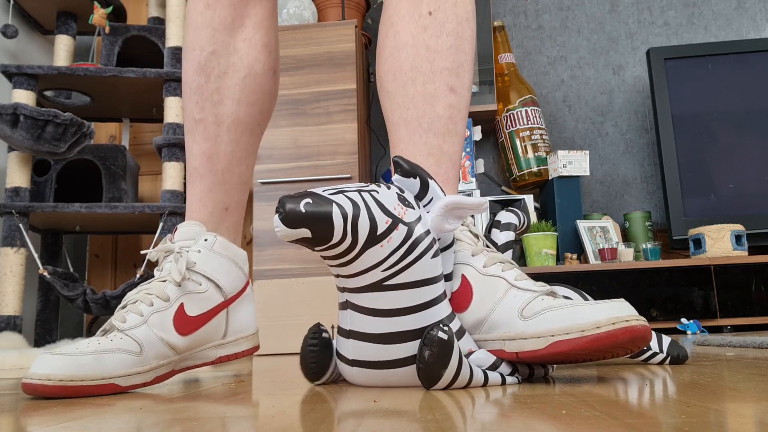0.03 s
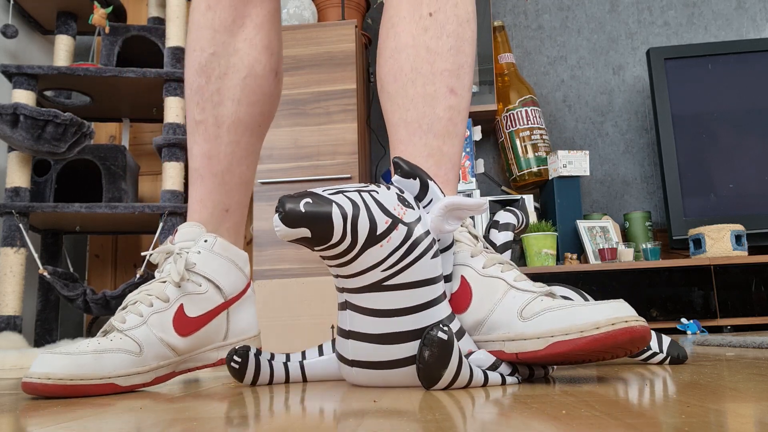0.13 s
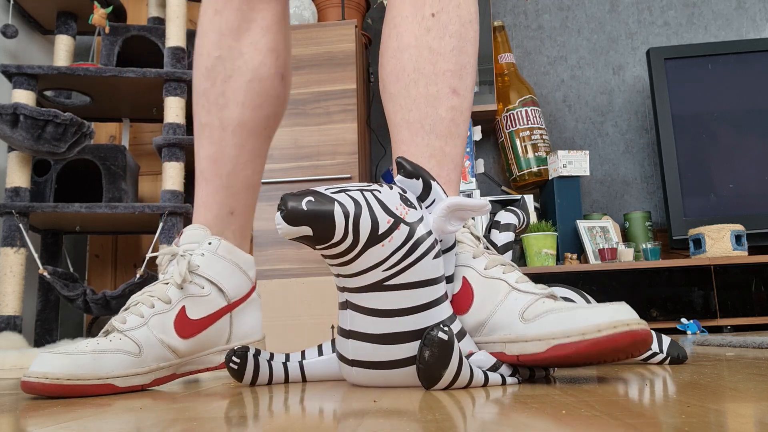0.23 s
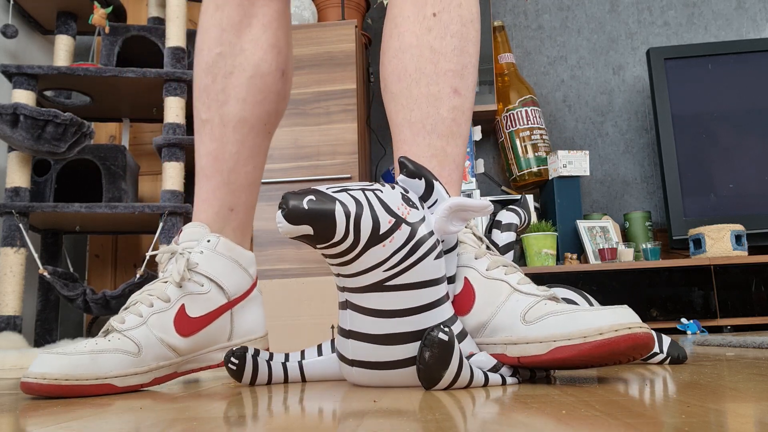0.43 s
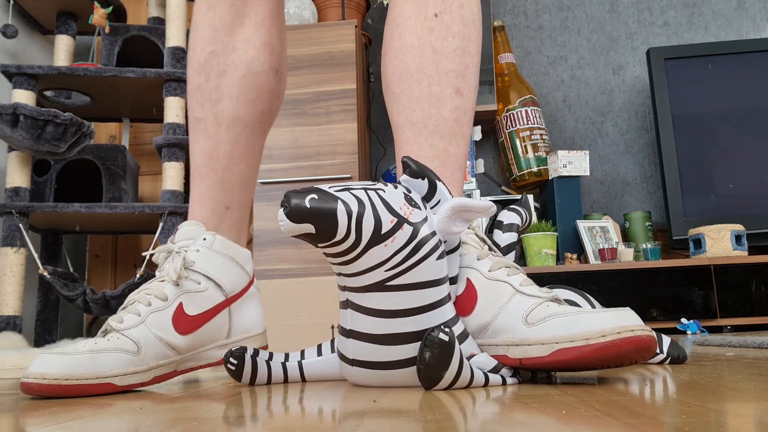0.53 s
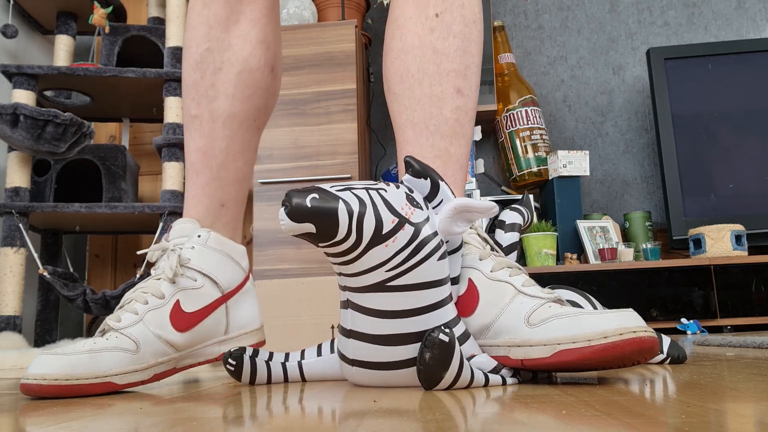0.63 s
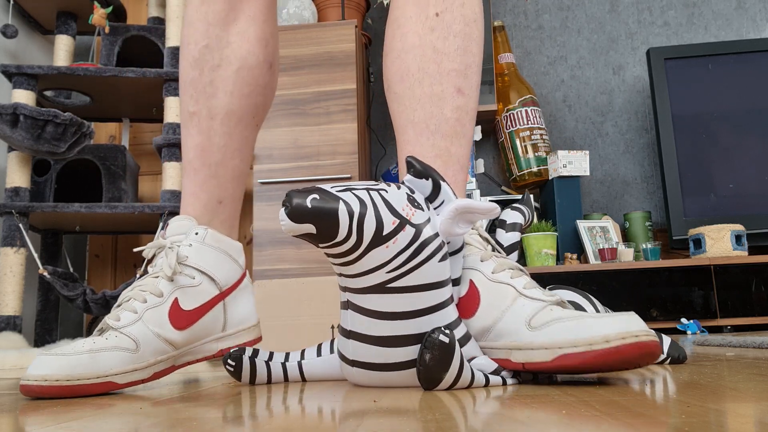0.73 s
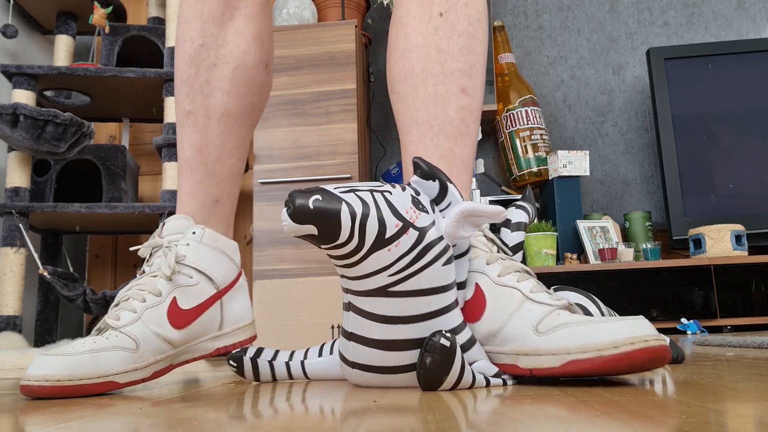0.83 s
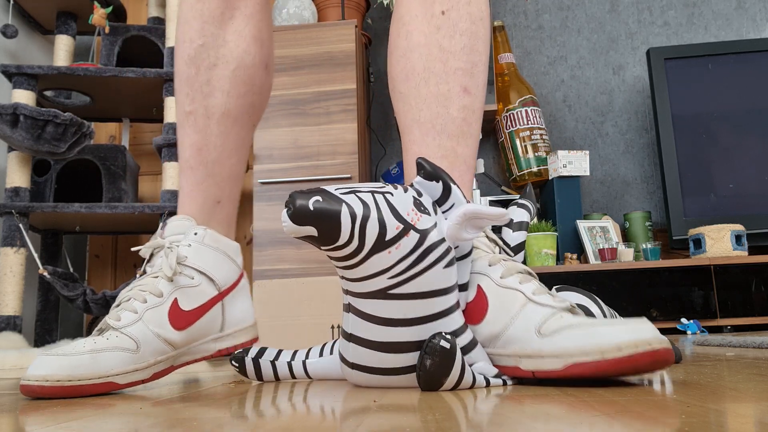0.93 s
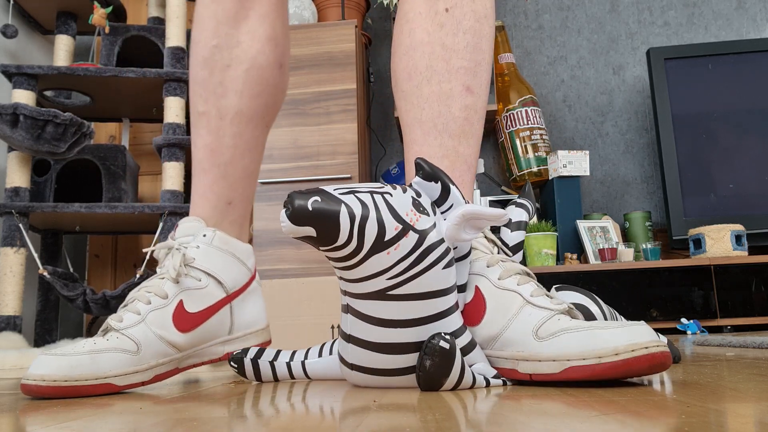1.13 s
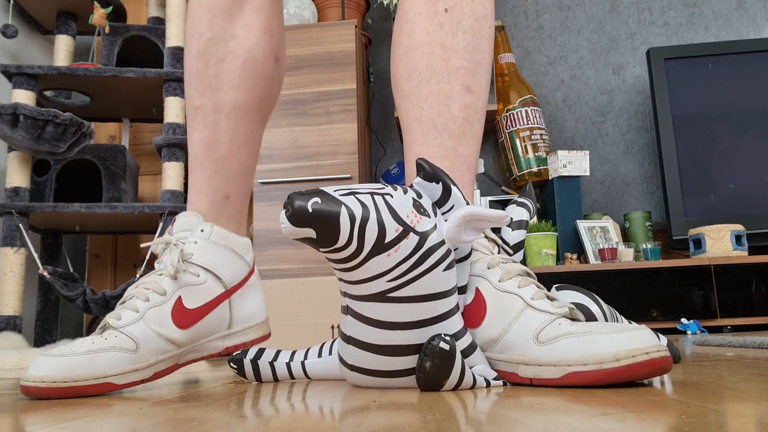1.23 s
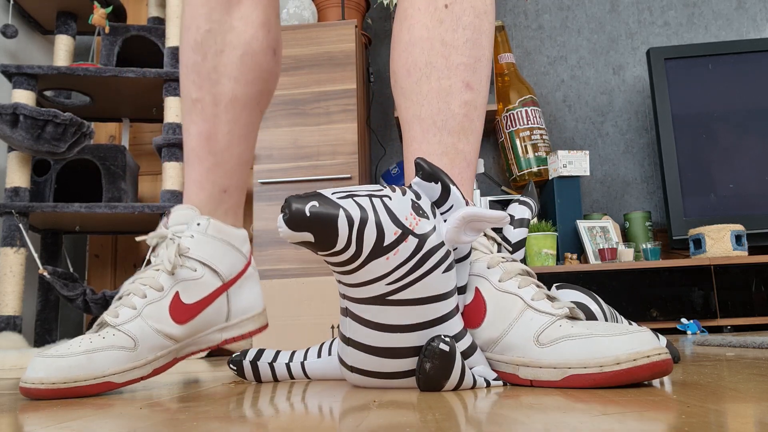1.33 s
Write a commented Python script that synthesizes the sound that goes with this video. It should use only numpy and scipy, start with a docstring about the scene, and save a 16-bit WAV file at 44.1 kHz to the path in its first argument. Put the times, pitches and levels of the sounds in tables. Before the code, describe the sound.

One hollow thump of a kicked inflatable toy, with soft shoe rubbing on vinyl.

```python
"""An inflatable vinyl toy is brushed by a sneaker and kicked with one hollow thump in a quiet living room.
Its skin caves in and springs back, and the air-filled body rings in its normal modes. The shoe rubs
along the vinyl, where stick-slip friction excites the resonances of the skin, then settles with two
soft steps that make the wooden floor boom. The skin and the sole give small ticks."""
import sys
import numpy as np
from scipy import signal
from scipy.fft import rfft, irfft
from scipy.io import wavfile

SR = 44100
rng = np.random.default_rng(int(sys.argv[2]) if len(sys.argv) > 2 else 0)


def log_audio(samples):
    """Write samples as a 16-bit WAV file to the path given in sys.argv[1]."""
    # one column per channel
    frames = np.atleast_2d(samples).T
    # limit to full scale, then quantise
    limited = np.clip(frames, -1, 1)
    pcm = np.round(limited * 32767).astype(np.int16)
    wavfile.write(sys.argv[1], SR, pcm)


N = 61739
T = np.arange(N) / SR
KICK_S = .2551

# soft contacts of the wobbling toy with the shoe: start_s, puff_db, ring_db
CONTACTS = [(0.284, -19.5, -41.5), (.309, -63, -46), (0.344, -38, -59.5), (0.397, -37, -64.5),
            (0.6614, -36.5, -88), (.912, -41, -81), (1.101, -43, -66.5), (1.286, -47, -86),
            (1.363, -49.5, -93), (1.383, -47.5, -91)]
# spectrum of the sole striking the floor: frequency_hz, relative_db
SOLE_SPECTRUM = [(100, -4.5), (550, -18), (1250, -2), (1800, -8), (2400, -7.5), (3300, -13.5), (4500, -21),
                 (8000, -38), (15000, -32)]


def amp(db):
    """Decibels to amplitude ratio."""
    return 10 ** (np.asarray(db) / 20)


def unit(x):
    """Normalisation to an rms of one."""
    return x / np.sqrt(np.mean(x ** 2) + 1e-20)


def read(points, hz):
    """Interpolation on a log-frequency axis."""
    knots_hz, values = np.transpose(points)
    return np.interp(np.log(hz + 1), np.log(knots_hz + 1), values)


def add(mix, start_s, sound):
    """Superposition: a sound joins the mix at its start time."""
    part = mix[max(round(start_s * SR), 0):][:len(sound)]
    part += sound[:len(part)]


def colour(x, spectrum):
    """Spectral shaping by a minimum-phase filter of unit energy."""
    log_gain = np.log(amp(read(spectrum, abs(np.fft.fftfreq(4096, 1 / SR)))))
    taps = np.fft.ifft(np.exp(np.conj(signal.hilbert(log_gain)))).real[:2048]
    return signal.fftconvolve(x, taps / np.linalg.norm(taps))[:len(x)]


def burst(decay_s):
    """A broadband transient: noise under exponential decay."""
    return rng.standard_normal(4096) * np.exp(-T[:4096] / decay_s)


def ring(modes):
    """Free vibration: each normal mode is a damped sine."""
    return sum(amp(db - 60 * T / t60_s) * np.sin(2 * np.pi * hz * T) for hz, db, t60_s in modes)


def friction(strokes, spectrum, slips_per_s=3800, spread_db=4, hiss_share=0.22):
    """Stick-slip friction: dense random impulses and smooth hiss follow the level of each stroke."""
    slips = (rng.random(N) < slips_per_s / SR) * rng.choice([-1, 1], N)
    sizes = amp(spread_db * np.minimum(rng.exponential(1, N), 4))
    hiss = np.sqrt(hiss_share) * rng.standard_normal(N)
    grain = np.sqrt(1 - hiss_share) * unit(slips * sizes) + hiss
    envelope = sum(amp(np.interp(T, *np.transpose(stroke), left=-140, right=-140)) for stroke in strokes)
    return colour(grain * envelope, spectrum)


def skin(x, direct_db=-1):
    """Membrane resonance: a scrape or slap also excites the narrow modes of the taut vinyl."""
    # skin resonances: pitch_hz, gain_db, bandwidth_hz
    modes = [(820, 0.5, 55), (1145, 3, 35), (1530, -0.5, 45), (1627, -2, 50), (1864, -2, 36),
             (1996, 0.5, 31), (2205, 2, 42), (2345, 0, 40), (2458, 2, 35), (2673, 2, 45), (2778, 0, 75),
             (2940, -1, 27), (4670, -11.5, 180)]
    resonant = sum(amp(db) * signal.lfilter(*signal.iirpeak(hz, hz / width_hz, SR), x)
                   for hz, db, width_hz in modes)
    return amp(direct_db) * x + resonant


def rubbing():
    """Sliding friction on vinyl: a faint shuffle, a swipe into the kick, then rubs after it."""
    # stroke envelopes (rubs holds several): time_s, level_db
    shuffle = [(0, -67), (.04, -68.5), (.08, -60.5), (.12, -60), (.16, -68.5), (.2, -70)]
    swipe = [(.0, -88.5), (.15, -71.5), (.205, -58), (.225, -42.5), (.24, -37.5), (.251, -31.5),
             (.258, -42), (.266, -65)]
    rubs = [
        [(.56, -91.5), (.6, -78), (.655, -70.5), (.7, -60.5), (.765, -56.5), (.8, -64), (.83, -85)],
        [(.86, -72.5), (.886, -60.5), (.905, -54), (.925, -50), (.96, -50), (.98, -53.5), (.998, -53),
         (1.018, -56.5), (1.034, -55.5), (1.048, -71)],
        [(1.09, -89), (1.12, -69.5), (1.14, -70.5), (1.17, -77)],
        [(1.245, -74.5), (1.265, -73.5), (1.29, -69), (1.32, -95), (1.345, -70.5), (1.39, -78), (1.4, -75)],
    ]
    # their friction spectra: frequency_hz, relative_db
    shuffle_spectrum = [(60, -47.5), (140, -22), (306, -21.5), (600, -4), (808, -2.5), (1100, -5.5),
                        (2000, -7.5), (3320, -14), (15500, -35)]
    swipe_spectrum = [(50, -39), (110, -11), (550, -16.5), (843, -2), (1160, -13.5), (2870, -1.5),
                      (3770, -9), (6000, -14), (7000, -20.5), (11500, -15), (15500, -27.5)]
    rub_spectrum = [(60, -39), (160, -21.5), (264, -16.5), (680, -16), (1210, -4.5), (1880, -5.5),
                    (2090, -5), (2750, 0), (3460, -8), (4700, -9.5), (5100, -14.5), (6120, -13),
                    (7400, -25.5), (8800, -19), (15500, -30)]
    brushing = friction([shuffle], shuffle_spectrum)
    scraping = friction([swipe], swipe_spectrum) + friction(rubs, rub_spectrum)
    return brushing + skin(scraping)


def kick(slap_db=-20.5, slap_lead_s=.0006, low_cut_hz=30):
    """Impact on a membrane: the slapped skin caves in, then the enclosed air springs back."""
    # rarefaction, then compression: delay_s, relative_pressure, width_s
    swings = [(0, -.22, .00026), (.0013, .22, .00032)]
    # spectrum of the slap: frequency_hz, relative_db
    spectrum = [(60, -16.5), (150, -3.5), (400, 5.5), (620, -11.5), (830, 6), (1100, -0.5), (1900, 0.5),
                (2700, -10.5), (3800, -14.5), (6000, -23), (15000, -32)]
    pressure = sum(size * np.exp(-.5 * ((T - KICK_S - delay_s) / width_s) ** 2)
                   for delay_s, size, width_s in swings)
    out = signal.lfilter(*signal.butter(2, low_cut_hz, "high", fs=SR), pressure)
    slap = skin(colour(burst(decay_s=0.0049), spectrum))
    add(out, KICK_S - slap_lead_s, amp(slap_db) * slap)
    return out


def toy(kick_ring_db=-39.5, spring_back_s=.0012):
    """Cavity resonance: the air-filled body rings after the kick and again with each bump."""
    # body modes: pitch_hz, relative_db, t60_s
    modes = [(37.54, -17.5, 0.27), (65.4, -18, 0.098), (118.5, -8, 0.25), (144.9, 2, .33), (192, -8, 0.34),
             (205.8, -2.5, 0.25), (242.7, -3.5, .2), (375, -14.5, 0.067), (400, -13, 0.13),
             (453, -12.5, .12), (500, -11.5, 0.063), (708, -7.5, 0.39), (823, -8.5, 0.047),
             (1157, -30.5, .16)]
    out, ringing = np.zeros(N), ring(modes)
    add(out, KICK_S + spring_back_s, amp(kick_ring_db) * ringing)
    for start_s, _, ring_db in CONTACTS:
        add(out, start_s, amp(ring_db) * ringing)
    return out


def bumps():
    """Compliant contact carries little treble: the toy wobbles against the shoe with dull puffs."""
    # spectrum of a puff: frequency_hz, relative_db
    spectrum = [(40, -22), (110, -14.5), (180, -5.5), (300, -8.5), (520, -6.5), (800, -15.5), (2000, -38.5),
                (8000, -70.5)]
    out = np.zeros(N)
    for start_s, puff_db, _ in CONTACTS:
        puff = burst(decay_s=.005)
        add(out, start_s, amp(puff_db) * puff / np.linalg.norm(puff))
    return colour(out, spectrum)


def ticks():
    """Brief transients are broadband: the vinyl skin crinkles in bright ticks."""
    # crinkles: start_s, level_db, decay_s
    crinkles = [(0.401, -62, 0.0049), (0.424, -54.5, 0.0029), (0.4728, -48.5, 0.0031), (.564, -68, 0.001),
                (.6612, -52, 0.011), (1.064, -57, .001), (1.072, -51.5, 0.00074), (1.116, -50, 0.00059),
                (1.1436, -46.5, 0.00095)]
    # spectrum of a tick: frequency_hz, relative_db
    spectrum = [(100, -15), (400, 1), (1000, 1), (2500, 4.5), (3800, 3), (5000, 3.5), (7500, -8),
                (9000, -1.5), (15000, -9.5)]
    out = np.zeros(N)
    for start_s, db, decay_s in crinkles:
        add(out, start_s, amp(db) * burst(decay_s) / 2)
    return colour(out, spectrum)


def steps(grit_db=-9, boom_rise_s=0.0041):
    """Impact on a plate: the sole lands with a gritty knock and the floor's modes boom."""
    # footfalls: start_s, push_db, width_ms, boom_db
    footfalls = [(1.0240, -38, 0.27, -42.5), (1.1996, -50.5, 0.43, -48.5)]
    # floor modes: pitch_hz, relative_db, t60_s
    modes = [(31.8, -14, 0.61), (69.5, -21, .26), (81.6, -1, 0.27), (168.3, -6.5, 0.118),
             (219, -6.5, 0.086), (338, -11.5, 0.055)]
    knocks, booms = np.zeros(N), np.zeros(N)
    boom = ring(modes) * (1 - np.exp(-T / boom_rise_s))
    for start_s, push_db, width_ms, boom_db in footfalls:
        u = (T - start_s) / (width_ms / 1000)
        knocks += amp(push_db) * u * np.exp((1 - u ** 2) / 2)  # one pressure swing, down then up
        grit = colour(burst(decay_s=0.0013), SOLE_SPECTRUM)
        add(knocks, start_s, amp(push_db + grit_db) * grit)
        add(booms, start_s, amp(boom_db) * boom)
    return knocks, booms


def clacks():
    """Impulse response: the sole snaps against the floor as the weight shifts."""
    # snaps of the sole: start_s, peak_db
    snaps = [(1.2575, -41), (1.3408, -52.5), (1.3542, -42.5)]
    out, snap = np.zeros(N), colour(signal.unit_impulse(4096), SOLE_SPECTRUM)
    for start_s, db in snaps:
        add(out, start_s, amp(db) * snap / abs(snap).max())
    return out


def diffuse(corner_hz=740):
    """A diffuse field: noise coherent at both microphones in the bass, unrelated in the treble."""
    left, independent = rfft(rng.standard_normal((2, N)))
    coherence = 1 / (1 + (np.fft.rfftfreq(N, 1 / SR) / corner_hz) ** 2)
    right = coherence * left + np.sqrt(1 - coherence ** 2) * independent
    return irfft(np.array([left, right]), N)


def air(level_db=-75):
    """Ambient noise: the room's air is a faint, steady diffuse field."""
    # ambient spectrum: frequency_hz, relative_db
    spectrum = [(10, -43.5), (22, -13.5), (35, -13.5), (70, -9), (120, -21), (300, -16), (700, -16.5),
                (1900, -25.5), (4000, -24), (15500, -41.5)]
    return amp(level_db) * unit(np.array([colour(side, spectrum) for side in diffuse()]))


def from_left(x, lag_s=0.00013, side_db=1.6, scatter_rad_per_khz=.13, scatter_width_hz=250):
    """Path difference and diffraction: sound bends round the toy to the right, later and weaker."""
    hz = np.fft.rfftfreq(N, 1 / SR)
    knots_hz = np.arange(0, SR / 2, scatter_width_hz)
    ripple = np.interp(hz, knots_hz, rng.standard_normal(N)[:len(knots_hz)])
    phase = scatter_rad_per_khz * hz / 1000 * ripple - 2 * np.pi * hz * lag_s
    far = irfft(rfft(x) * np.exp(1j * phase), N)
    return np.array([x * amp(side_db), far * amp(-side_db)])


def room(x, wet_db, early_db, early_decay_s=0.0082, rise_s=0.00083):
    """Reverberation: early reflections off floor and furniture, then each band decays at its own rate."""
    # reverberation times: frequency_hz, t60_s
    decay_times = [(60, 0.34), (200, 0.29), (500, 0.22), (900, 0.23), (2500, 0.2328), (6000, 0.3441),
                   (15000, .2)]
    hz, frame_s, bands = signal.stft(diffuse()[:, :SR // 2], SR, nperseg=256)
    decay = amp(-60 * frame_s / read(decay_times, hz)[:, None])
    tail = signal.istft(bands * decay, SR, nperseg=256)[1]
    t = T[:tail.shape[1]]
    onset = np.minimum(t / rise_s, 1) ** 2
    early_boost = 1 + amp(early_db) * np.exp(-t / early_decay_s)
    response = tail * onset * early_boost
    return amp(wet_db) * signal.fftconvolve(x[None], response / np.linalg.norm(response[0]), axes=1)[:, :N]


def scene():
    """Superposition in one room: kick and rubbing slightly left, the other sources in the middle."""
    rubs, blow = rubbing(), kick()
    knocks, booms = steps()
    taps = knocks + ticks() + clacks() + bumps()
    ambience = air()
    direct = from_left(blow + rubs) + toy() + booms + taps
    reflected = room(blow, wet_db=-8.5, early_db=10)
    reflected += room(rubs, wet_db=-4.5, early_db=12.5)
    reflected += room(taps, wet_db=-2.5, early_db=6)
    return direct + reflected + ambience


def record(dry, low_cut_hz=36, high_cut_hz=15950):
    """Band limiting: the microphone sheds the deepest bass, and a low-pass the highest treble."""
    lean = signal.lfilter(*signal.butter(2, low_cut_hz, "high", fs=SR), dry)
    low_pass = signal.firwin(511, high_cut_hz, window=("kaiser", 9), fs=SR)
    return signal.oaconvolve(lean, low_pass[None], "same")


dry = scene()
out = record(dry)
log_audio(out)
```